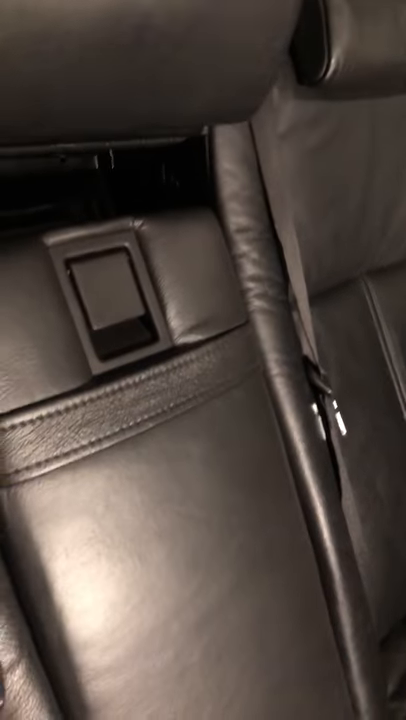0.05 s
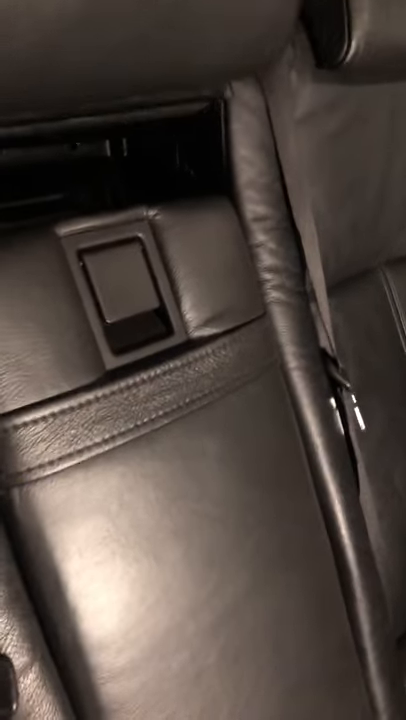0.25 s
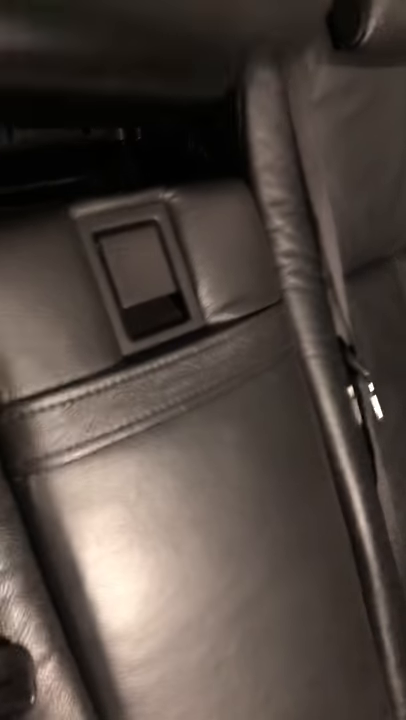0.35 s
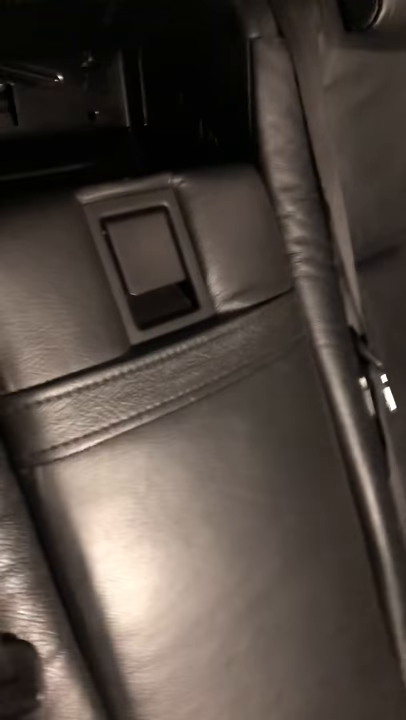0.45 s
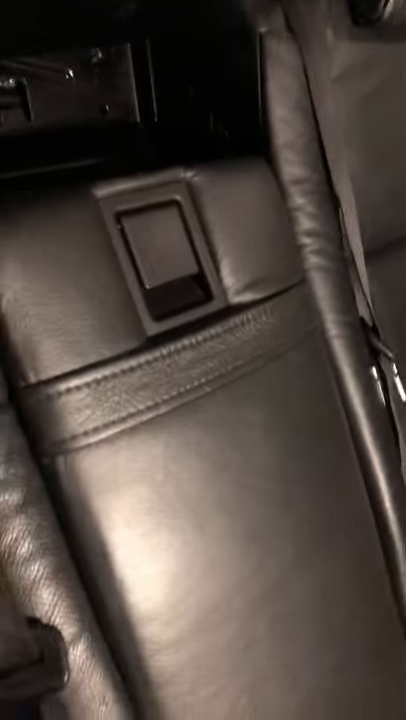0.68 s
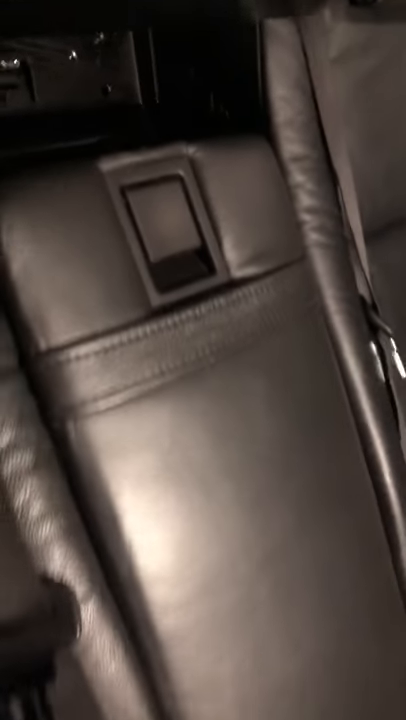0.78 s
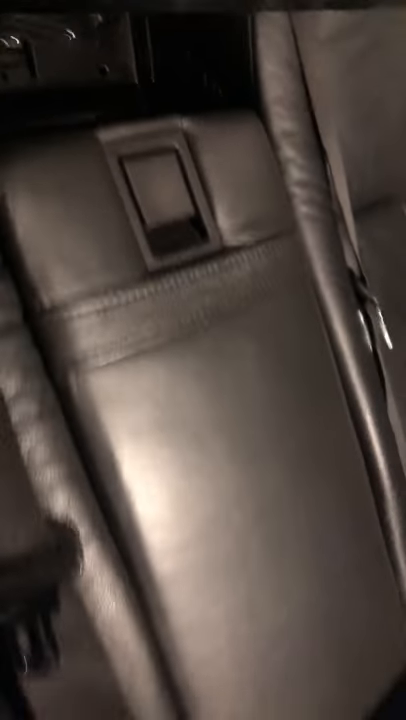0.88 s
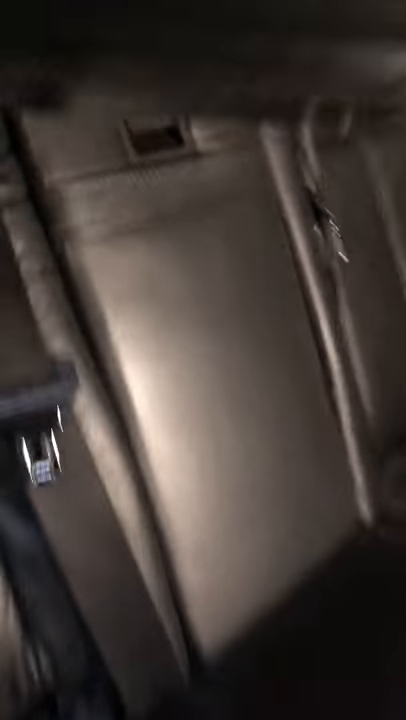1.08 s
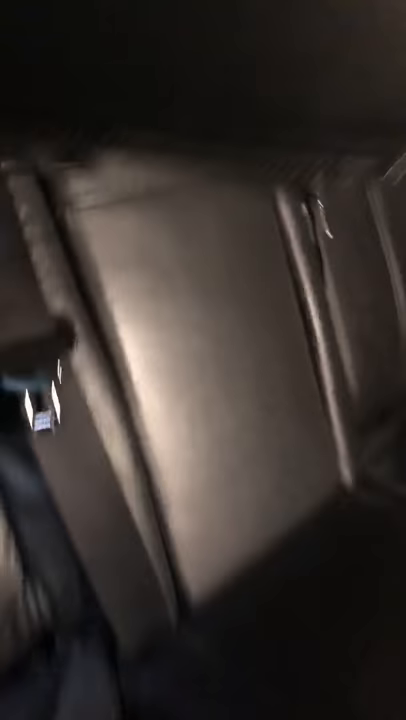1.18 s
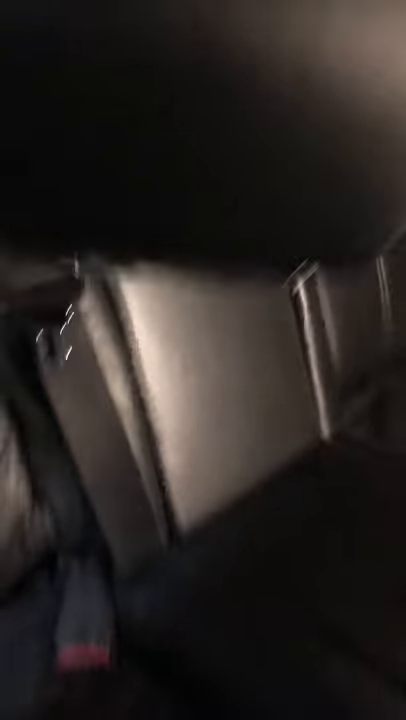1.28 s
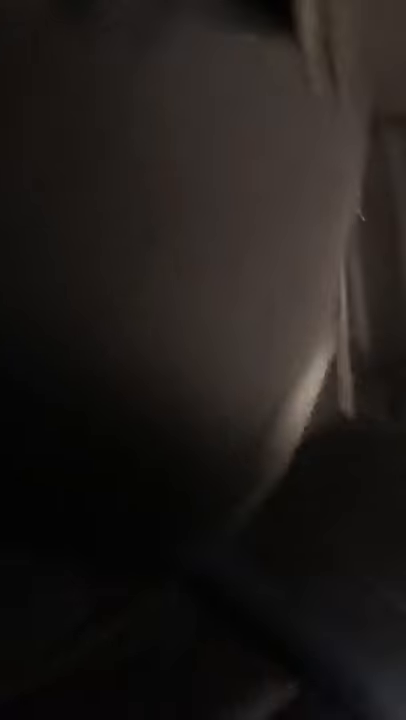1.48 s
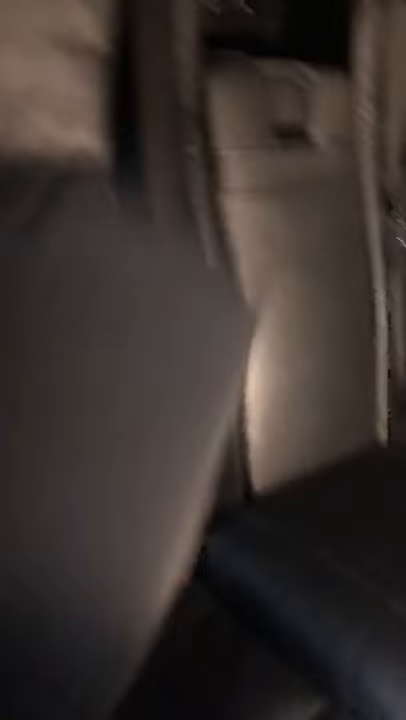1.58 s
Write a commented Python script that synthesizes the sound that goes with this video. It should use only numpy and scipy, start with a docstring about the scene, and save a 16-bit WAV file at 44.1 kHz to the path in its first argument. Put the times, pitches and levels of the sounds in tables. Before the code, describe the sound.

Plastic seat panel bumps, clatters shut and latches inside a quiet car.

```python
"""A plastic panel in a leather car seat is pushed along and shut: two light bumps, a rough run of
knocks, a last latch click. Each contact rings the panel's resonances. The seat back thumps in its low
modes, the trim ticks, a few dull notes land, and the closing blow leaves the springs humming faintly.
Leather rustles and cloth slides, both shaped noise, in a quiet, well-damped cabin."""
import sys
import numpy as np
from scipy import signal
from scipy.fft import rfft, irfft
from scipy.io import wavfile

SR = 44100
rng = np.random.default_rng(int(sys.argv[2]) if len(sys.argv) > 2 else 0)


def put_to_file(sound):
    """Save the sound as 16-bit audio at rate SR, in the file named by the first command-line argument."""
    columns = np.atleast_2d(sound).T  # one column per channel
    safe = np.clip(columns, -1, 1)
    whole_steps = np.round(safe * 32767)
    wavfile.write(sys.argv[1], SR, whole_steps.astype(np.int16))


N = 72765


def amp(db):
    """Decibels to gain."""
    return 10 ** (np.asarray(db) / 20)


def unit(x):
    """Scale to rms 1."""
    return x / np.sqrt(np.mean(x ** 2) + 1e-20)


def decay(t, t60):
    """An envelope that falls 60 dB in t60 seconds."""
    return np.exp(-np.log(1000) * t / t60)


def curve_at(points, hz):
    """Read a curve of (frequency [Hz], value) points on a log frequency axis."""
    point_hz, values = np.transpose(points)
    return np.interp(np.log(hz + 1), np.log(point_hz + 1), values)


def fader(points):
    """Gain per sample from (time [s], level [dB]) points."""
    return amp(np.interp(np.arange(N) / SR, *np.transpose(points)))


def filtered(x, response):
    """Filter x with a response given as a function of frequency."""
    return irfft(rfft(x, 4 * SR) * response(np.fft.rfftfreq(4 * SR, 1 / SR)))[:len(x)]


def minimum_phase(db):
    """An EQ response with these gains and no pre-ring."""
    cepstrum = irfft(db * np.log(10) / 20)
    half = len(cepstrum) // 2
    return np.exp(rfft(np.r_[cepstrum[0], 2 * cepstrum[1:half]], len(cepstrum)))


def resonance(hz, centre, width):
    """Response of one resonance, 1 at its centre."""
    return 1j * hz * width / (centre ** 2 - hz ** 2 + 1j * hz * width)


def ring_modes(modes, t):
    """Decaying sines from (frequency [Hz], level [dB], t60 [s]) rows."""
    return sum(amp(db) * decay(t, t60) * np.sin(2 * np.pi * hz * t) for hz, db, t60 in modes)


def noise(spectrum):
    """Coloured noise of rms 1."""
    return unit(filtered(rng.standard_normal(N), lambda hz: amp(curve_at(spectrum, hz))))


def add(track, s, sound):
    """Mix a sound in at s seconds."""
    part = track[max(0, round(s * SR)):][:len(sound)]
    part += sound[:len(part)]


# Tone of the hush and of the rumble (frequency [Hz], relative level [dB])
HUSH_EQ = [(15, -31), (25, -8.5), (114, 1), (206, -7), (394, -8), (818, -18), (1480, -16.5), (2160, -20),
           (2910, -24.5), (16000, -34)]
RUMBLE_EQ = [(20, -39), (38, -28.5), (49, 7.5), (58, -9), (72, -13.5), (120, -24.5), (300, -41.5),
             (1000, -69.5)]
# Fader ride of the rumble (time [s], level [dB])
RUMBLE_RIDE = [(0, -42), (.3, -45.5), (.6, -43), (.85, -48.5), (1.04, -58), (1.15, -51), (1.33, -65),
               (1.65, -81)]


def cabin(hush_db=-60.5):
    """The bed: a steady cabin hush and a low rumble that ebbs away."""
    return amp(hush_db) * noise(HUSH_EQ) + fader(RUMBLE_RIDE) * noise(RUMBLE_EQ)


# Tone of rubbed leather (frequency [Hz], relative level [dB])
LEATHER_EQ = [(100, -1.5), (350, 8), (900, 0.5), (1700, -9.5), (3000, -14), (5500, -16), (9000, -23.5),
              (15000, -28.5)]
# Fader ride of the rustle (time [s], level [dB])
LEATHER_RIDE = [(0, -42), (.035, -52.5), (.055, -48.5), (.115, -45), (.145, -61), (.19, -52.5), (.275, -42),
                (.305, -59.5), (.35, -51), (.39, -33.5), (.5, -28.5), (.59, -45), (.62, -45), (.75, -56),
                (1.25, -75), (1.65, -64)]


def leather():
    """Leather rubs with a dark rustle, fullest under the run of knocks."""
    return fader(LEATHER_RIDE) * noise(LEATHER_EQ)


# Low modes of the seat back (frequency [Hz], relative level [dB], t60 [s])
SEAT_MODES = [(50.5, -17, 0.38), (69.5, -11, 0.43), (84, 1, 0.2), (138.3, -4.5, 0.24), (178.3, 0, 0.077),
              (201.6, -8, 0.28)]
# Pushes on the seat (time [s], level [dB])
SEAT_PUSHES = [(.002, -33), (0.054, -56), (.125, -32.5), (0.225, -28), (0.448, -24.5), (0.479, -38),
               (0.533, -24.5), (.555, -37), (0.625, -41), (.704, -42), (1.411, -50.5), (1.602, -47.5)]


def seat_back(rise_s=0.0081):
    """Heavy pushes rock the padded seat back in its few low modes."""
    out, t = np.zeros(N), np.arange(SR) / SR
    thump = ring_modes(SEAT_MODES, t) * (1 - np.exp(-t / rise_s))
    for s, db in SEAT_PUSHES:
        add(out, s, amp(db) * thump)
    return out


# Ticks of the trim (time [s], band centre [Hz], level [dB])
TRIM_TICKS = [(0.0332, 4000, -41), (.236, 4000, -31), (0.327, 3480, -45), (.356, 3770, -33.5),
              (0.374, 5590, -44), (1.209, 2800, -54), (1.2897, 5100, -56)]


def trim_ticks(tick_t60=0.0045, tail_t60=0.093, tail_db=-15.5, width_octaves=0.55):
    """The trim gives tiny dry ticks, each with a faint tail from the cabin."""
    out, t = np.zeros(N), np.arange(SR // 8) / SR
    envelope = decay(t, tick_t60) + amp(tail_db) * decay(t, tail_t60)
    for s, hz, db in TRIM_TICKS:
        band = lambda f: 1 / (1 + (np.log2((f + 1) / hz) / width_octaves) ** 2)
        burst = unit(filtered(rng.standard_normal(len(t)), band))
        add(out, s, amp(db) * envelope * burst)
    return out


# Hits on the panel, levels pre-EQ (time [s], bass [dB], hollow [dB], body [dB], clack [dB], snap [dB],
# attack [s], length [x base decay], accent frequency [Hz], accent boost [dB])
PANEL_HITS = [(0.0901, -50, -48.5, -39.5, -45, -46.5, 0.00099, 1, 680, 15.5),
              (0.0951, -33, -31, -32, -44.5, -58, 0.00032, 1, 1190, 6.5),
              (.2044, -50, -35, -36.5, -47, -70.5, 0.0018, 1.2, 680, 4.5),
              (.2178, -29.5, -39.5, -41, -55, -68, .0011, 1.2, 660, 15.5),
              (.230, -38, -42.5, -31, -37, -45, 0.0011, 1.2, 860, 9.5),
              (0.237, -41.5, -43, -42, -45, -51.5, 0.00027, .6, 1620, 13),
              (0.3269, -68.5, -61, -42, -55, -69, .0002, 1, 1000, 3),
              (.356, -57.5, -50, -41.5, -42.5, -70.5, 0.00016, .7, 4000, 5),
              (.3825, -46.5, -51, -30, -70.5, -68, 0.0011, 1.3, 960, 7),
              (0.4012, -41, -27, -15.5, -26.5, -28.5, 0.00058, .85, 770, 6.5),
              (0.4094, -34.5, -23.5, -21, -23, -27.5, 0.00028, .65, 1600, 8),
              (0.4215, -34, -17.5, -18, -18.5, -38.5, 0.000096, .6, 950, 8.5),
              (.4232, -26, -21, -13, -19.5, -43, 0.00017, .6, 950, 7),
              (0.4279, -31, -16, -21.5, -21.5, -45, 0.00027, .7, 548, 9.5),
              (0.438, -38.5, -30, -19, -35.5, -29.5, .0004, .8, 620, 1),
              (0.4544, -26.5, -27.5, -26.5, -21, -21, 0.000078, .62, 600, 1),
              (.471, -21, -15.5, -12, -22.5, -34.5, 0.00046, .65, 1170, 9),
              (.484, -20, -21.5, -16.5, -29.5, -25.5, 0.0072, 1, 460, 5),
              (.504, -25, -37, -21.5, -22.5, -32, .0018, 1.3, 1190, 12.5),
              (.52, -22.5, -30, -21, -26, -23.5, .0007, .9, 1200, 4.5),
              (0.5259, -14.5, -28.5, -27, -23, -27.5, 0.00014, .7, 380, 10),
              (0.5527, -34.5, -22, -31, -14.5, -20.5, 0.00016, .8, 370, 2.5),
              (.557, -25, -36.5, -24.5, -29, -27.5, 0.00038, .9, 1190, 8),
              (.566, -28, -44, -21, -39, -34, 0.00059, .8, 920, 10),
              (.586, -50.5, -35.5, -30, -32, -33.5, 0.00069, .9, 900, 7.5),
              (0.6851, -43, -36, -32, -36, -45, 0.00011, .8, 600, 8.5),
              (0.6997, -44.5, -37, -27.5, -32, -32, 0.0001, .8, 2680, 5),
              (.707, -34, -38.5, -34.5, -37.5, -58.5, 0.0021, 1.2, 1030, 9.5),
              (.730, -42, -39, -36.5, -47.5, -54, 0.00085, 1.1, 1030, 8),
              (1.291, -70, -55.5, -57.5, -67, -90, 0.00019, .9, 480, 3.5),
              (1.513, -52.5, -50.5, -56, -71, -82, 0.0007, .75, 590, 9.5)]
# Where bass, hollow, body, clack and snap sit (frequency [Hz])
HIT_TONE_HZ = [180, 450, 1100, 4000, 12000]
# Base decay of a hit (frequency [Hz], t60 [s])
PANEL_DECAY = [(120, 0.18), (300, 0.17), (1000, 0.077), (3000, 0.08), (8000, 0.068), (15000, 0.07)]
# Resonances of the panel (frequency [Hz], width [Hz], level against the plain knock [dB])
PANEL_MODES = [(314, 28, 2), (492, 32, -11.5), (859, 23, -2.5), (1006, 30, 1), (1186, 25.6, 3.5),
               (1663, 43, 1), (2520, 56, -5), (2627, 36, 1.5), (5180, 70, -2.5), (8070, 167, -5.5)]
# Overall tone of the panel (frequency [Hz], gain [dB])
PANEL_EQ = [(40, -19.5), (110, -7.5), (250, -9.5), (620, -3), (760, -9.5), (900, -4.5), (1220, -6),
            (1380, -9.5), (1600, -2.5), (2050, -6), (2500, -4), (3200, -5.5), (5400, -3), (7000, -5.5),
            (10000, -5), (15500, -9.5)]


def panel(rise_cycles=0.65, accent_q=11):
    """Each hit sets off a dense ring, shortest in the treble; where it lands accents one resonance."""
    out, t = np.zeros(N), np.arange(SR // 3) / SR
    hz = np.fft.rfftfreq(len(t), 1 / SR)
    band_hz = 110 * 2 ** (np.arange(16) / 2)  # half-octave bands
    centres = band_hz[:, None]
    band_masks = np.array([curve_at(np.c_[band_hz, row], hz) for row in np.eye(len(band_hz))]) > .5
    for s, *tone_db, attack, length, accent_hz, accent_db in PANEL_HITS:
        swell = 1 - np.exp(-t / (attack + rise_cycles / centres))  # low bands speak later
        envelopes = swell * decay(t, length * curve_at(PANEL_DECAY, centres))
        rings = envelopes * irfft(band_masks * rfft(rng.standard_normal(envelopes.shape)), len(t))
        # Each band carries just the energy of its envelope.
        rings /= np.linalg.norm(rings, axis=1, keepdims=True)
        rings *= np.linalg.norm(envelopes, axis=1, keepdims=True)
        knock = amp(curve_at(np.c_[HIT_TONE_HZ, tone_db], band_hz)) @ rings
        accent = 1 + (amp(accent_db) - 1) * resonance(hz, accent_hz, accent_hz / accent_q)
        add(out, s, irfft(rfft(knock) * accent, len(t)))
    body = lambda f: 1 + sum(amp(db) * resonance(f, centre, width) for centre, width, db in PANEL_MODES)
    return filtered(out, lambda f: body(f) * minimum_phase(curve_at(PANEL_EQ, f)))


# Soft taps and one low thump of the seat back (time [s], pitch [Hz], level [dB], t60 [s])
TAPS_AND_THUMP = [(0.0926, 296.5, -25, 0.083), (0.203, 280, -22.5, 0.1), (0.216, 312, -19.5, .06),
                  (.712, 71.6, -29.5, 0.2), (.953, 404, -35, 0.053)]


def taps_and_thump(rise_s=0.0025, scuff_db=-17):
    """Soft taps and one low thump of the seat back: each a dull note with a scuff of leather."""
    out, t = np.zeros(N), np.arange(N) / SR
    for s, hz, db, t60 in TAPS_AND_THUMP:
        envelope = (1 - np.exp(-t / rise_s)) * decay(t, t60)
        scuff = amp(scuff_db) * noise(LEATHER_EQ)
        add(out, s, amp(db) * envelope * (np.sin(2 * np.pi * hz * t) + scuff))
    return out


# Modes of the seat's springs (frequency [Hz], relative level [dB], t60 [s])
SPRING_MODES = [(191.5, -7, 1.1), (237.5, -4, 0.78), (275, -5, 0.99), (360.3, 7.5, 0.21)]


def springs(blow_s=0.553, gain_db=-34.5):
    """The closing blow leaves the seat's springs humming faintly."""
    out, t = np.zeros(N), np.arange(N) / SR
    add(out, blow_s, amp(gain_db) * ring_modes(SPRING_MODES, t))
    return out


# Tone of sliding cloth (frequency [Hz], relative level [dB])
CLOTH_EQ = [(240, -39), (400, -5.5), (527, -40), (726, -18.5), (942, -10.5), (1030, -13.5), (1340, -25),
            (1450, -11), (2150, -18.5), (3060, -20.5), (3460, -16.5), (4160, -21), (5650, -23),
            (9070, -24.5), (15500, -25.5)]
# Slope of the sheen, a high shelf (start [Hz], end [Hz])
SHEEN_SHELF_HZ = [6500, 10000]
# Strokes of cloth (time [s], swell [s], hold [s], fade [s], level [dB],
# resonance [Hz], resonance boost [dB], sheen [dB], comb spacing [Hz])
CLOTH_STROKES = [(0.72, 0.078, 0.037, 0.23, -56, 4730, 6.5, 5.5, 2290),
                 (0.936, 0.035, .19, .04, -62.5, 2860, 6, -2.5, 986),
                 (1.35, 0.075, 0.021, 0.12, -57, 1600, 1, -10, 1480)]


def cloth_slides(grain_db=2, grain_hz=120, peak_octaves=0.17, reflection_gain=0.42):
    """Cloth slides unevenly over the seat: a hiss with one resonance, combed by a close reflection."""
    out, t = np.zeros(N), np.arange(N) / SR
    for s, swell, hold, fade, db, peak_hz, peak_db, sheen_db, comb_hz in CLOTH_STROKES:
        bell = lambda f: amp(peak_db * np.exp(-(np.log2((f + 1) / peak_hz) / peak_octaves) ** 2))
        shelf = lambda f: amp(np.interp(f, SHEEN_SHELF_HZ, [0, sheen_db]))
        comb = lambda f: 1 + reflection_gain * np.exp(-2j * np.pi * f / comb_hz)
        hiss = filtered(noise(CLOTH_EQ), lambda f: bell(f) * shelf(f) * comb(f))
        grain = amp(grain_db * np.interp(t * grain_hz, np.arange(N), rng.standard_normal(N)))
        envelope = np.interp(t, s + np.cumsum([0, swell, hold, fade]), [0, 1, 1, 0])
        out += amp(db) * envelope * unit(hiss * grain)
    return out


def scene():
    """The mono mix: panel, seat, leather and cloth over the cabin's hush."""
    mix = cabin() + leather() + seat_back() + trim_ticks() + panel()
    return (mix + taps_and_thump() + springs() + cloth_slides())[None]


def record(dry, low_cut_hz=45, top_hz=15900):
    """The small microphone loses the deepest bass and keeps nothing above its band limit."""
    thin = signal.sosfilt(signal.butter(4, low_cut_hz, "high", fs=SR, output="sos"), dry[0])
    return filtered(thin, lambda hz: hz < top_hz)[None]


dry = scene()
out = record(dry)
put_to_file(out)
```